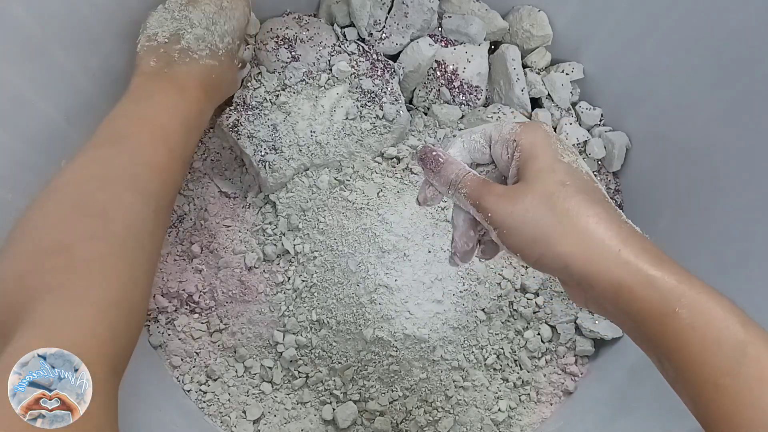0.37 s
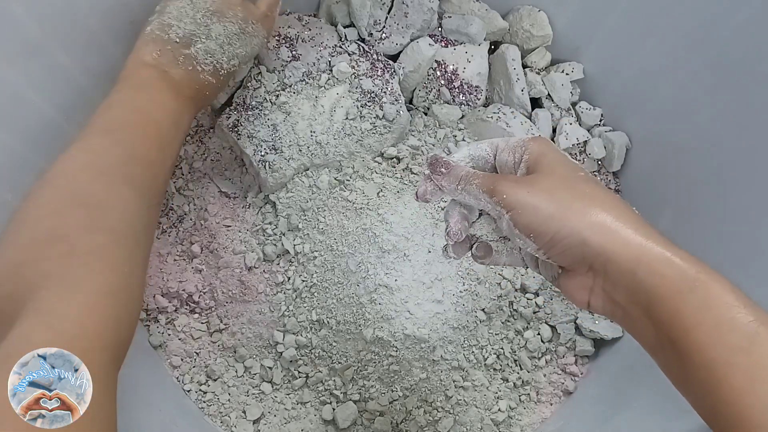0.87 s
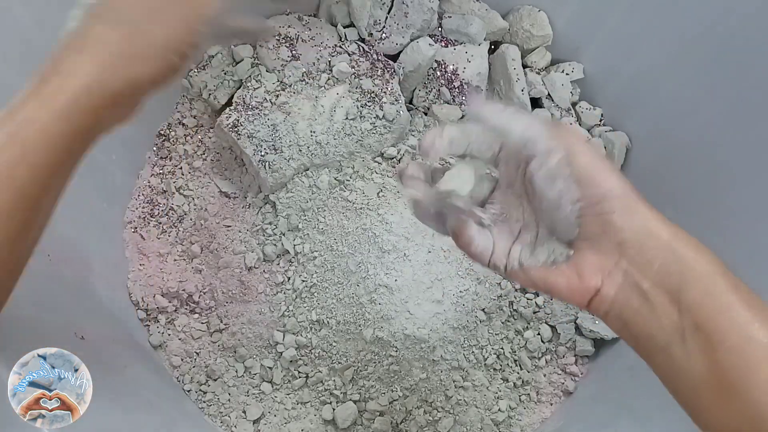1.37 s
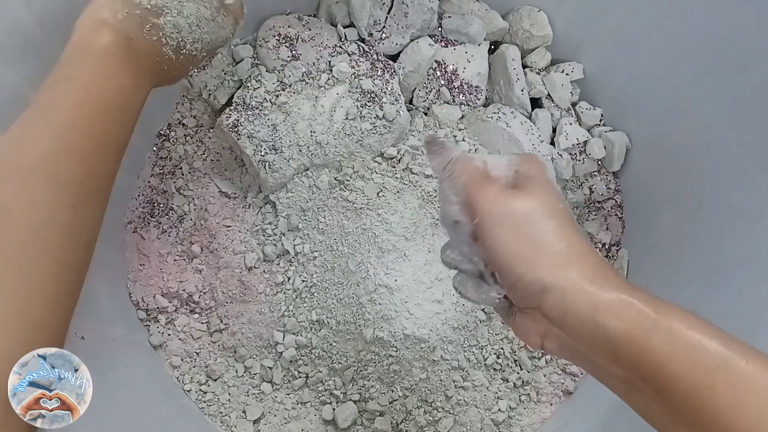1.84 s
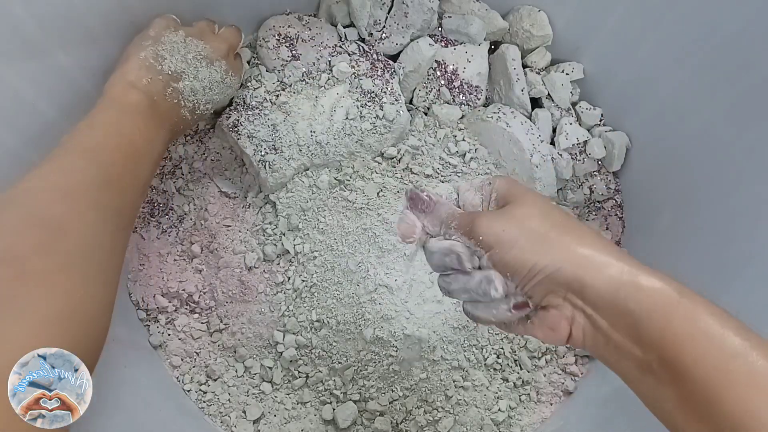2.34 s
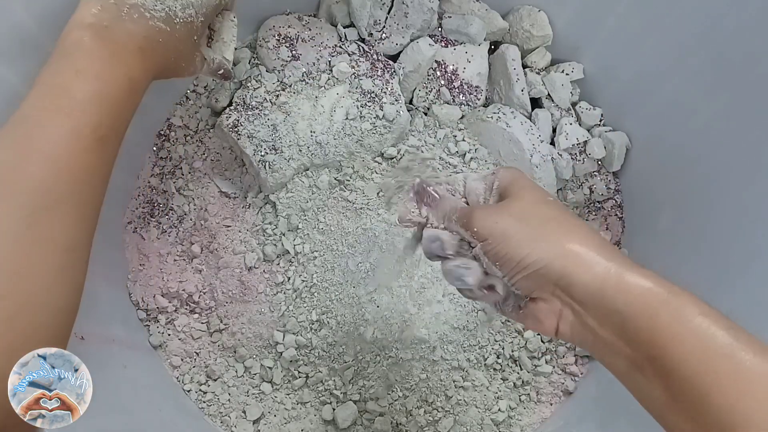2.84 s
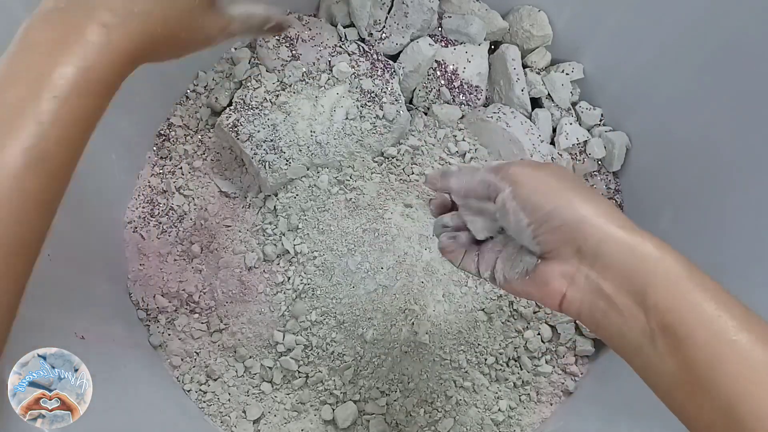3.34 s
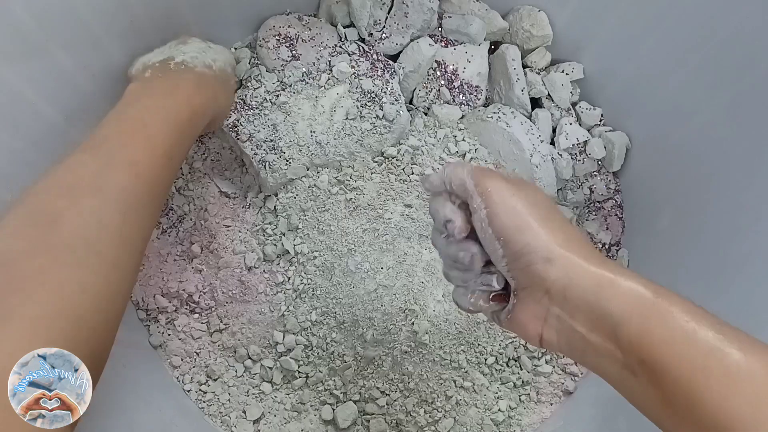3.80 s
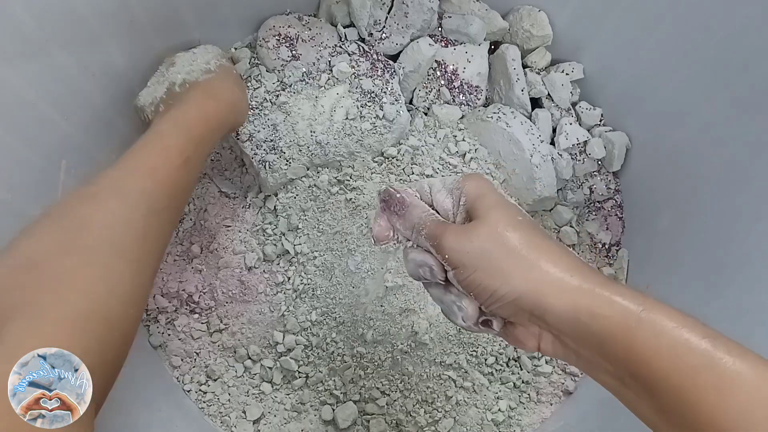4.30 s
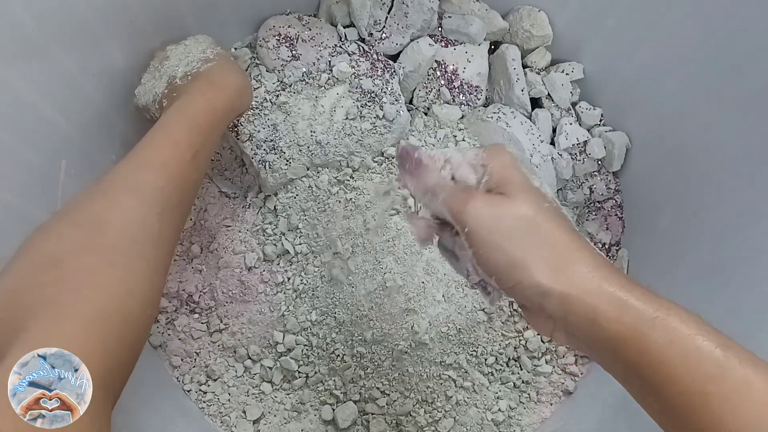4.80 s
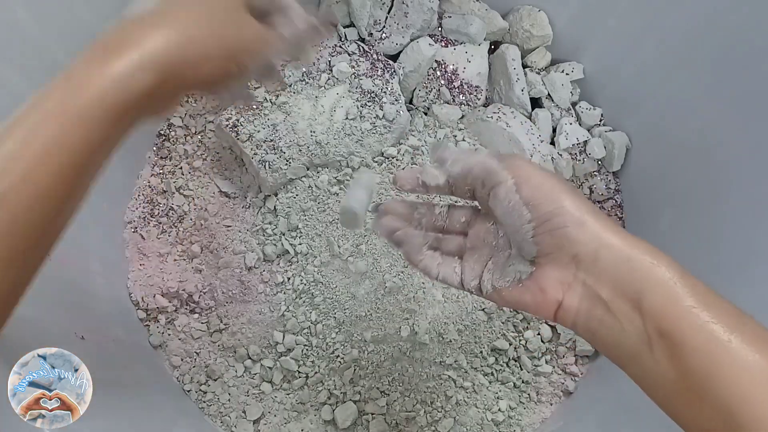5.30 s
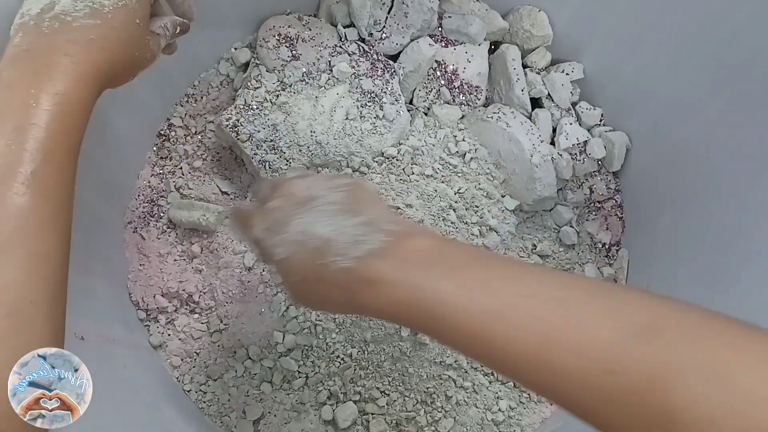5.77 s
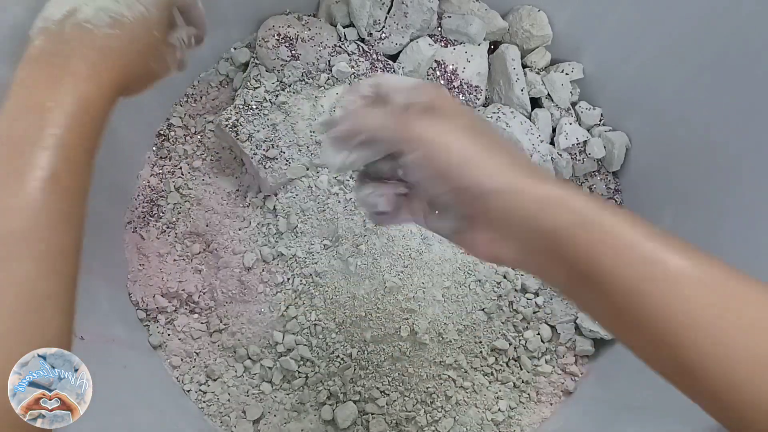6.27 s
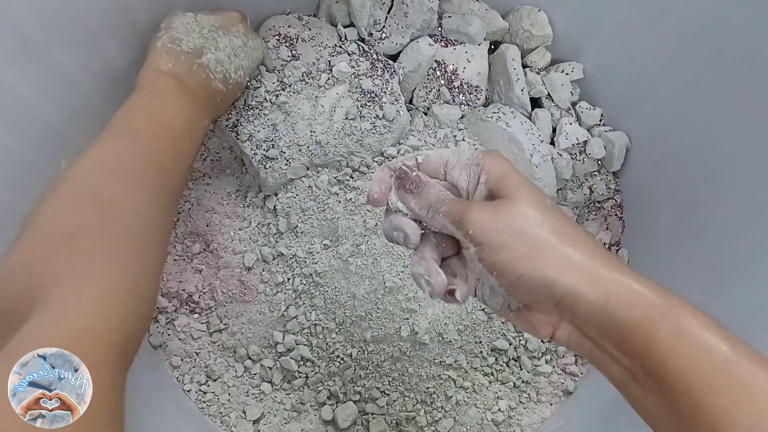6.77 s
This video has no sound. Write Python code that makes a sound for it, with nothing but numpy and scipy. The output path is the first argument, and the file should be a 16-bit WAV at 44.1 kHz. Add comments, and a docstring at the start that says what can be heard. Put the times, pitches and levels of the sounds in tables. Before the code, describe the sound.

Bright, dry grit rushes from pressing fingers while brittle lumps crack, some with a hollow cupped-hand colour. Early crumbling leads to thumps, then a run of crunches and snaps; a sharp crack at four and a half seconds precedes heavier drops and a last crisp break. Close, nearly mono sound with a very short basin tail, quiet airy room noise and thin rapid ticking.

```python
"""Crushing dry chalk over a basin

Hands crush dry chalk over a wide plastic basin in a quiet room, close to a small microphone.
Powder hisses and grinds as clumped noise grains; lumps snap in bursts of tiny cracks or knock as short rings.
Dropped chunks thud and ring the basin's modes. A low room rumble, steady air noise and a faint whine
lie underneath, with a thin electric tick that stutters about sixty times a second."""
import sys
import numpy as np
from scipy import signal
from scipy.fft import rfft, irfft, next_fast_len
from scipy.io import wavfile
from scipy.ndimage import uniform_filter1d

SR = 44100
rng = np.random.default_rng(int(sys.argv[2]) if len(sys.argv) > 2 else 0)


def bounce(signal):
    """Save signal as a 16-bit WAV file at the path given by the first command-line argument."""
    frames = np.transpose(np.atleast_2d(signal))
    limited = np.clip(frames, -1, 1)
    pcm = np.round(limited * 32767).astype(np.int16)
    wavfile.write(sys.argv[1], SR, pcm)


def how_loud(loudness_db):
    """Turn decibels into a plain amplitude multiplier (0 dB gives 1, 20 dB gives 10)."""
    steps = np.asarray(loudness_db, float) / 20
    return 10 ** steps


N = 303849  # length in samples


def evened(x):
    """Scales to rms 1."""
    return x / np.sqrt(np.mean(x ** 2) + 1e-20)


def colour(x, points):
    """Filters by a spectrum given as points on a log-frequency axis."""
    hz, db = np.transpose(points)
    size = next_fast_len(x.shape[-1])
    bins_hz = np.fft.rfftfreq(size, 1 / SR)
    gain = how_loud(np.interp(np.log(bins_hz + 1), np.log(hz), db))
    return irfft(rfft(x, size) * gain, size)[..., :x.shape[-1]]


def follow(table):
    """Joins the rows of a curve by straight lines, one array a column."""
    s, *columns = np.transpose(table)
    return [np.interp(np.arange(N) / SR, s, c) for c in columns]


def add(mix, s, sound):
    """Mixes a sound in at a time in seconds."""
    start = max(round(s * SR), 0)
    part = mix[start:start + len(sound)]
    part += sound[:len(part)]


def wander(width):
    """Slow random drift of rms 1: noise averaged twice over a width in samples."""
    return evened(uniform_filter1d(uniform_filter1d(rng.standard_normal(N), width), width))


def grit(per_s, spread_db, clump_ms, clump_db):
    """Dense cracks of uneven size that come in clumps."""
    sizes = how_loud(spread_db * np.minimum(rng.exponential(1, N), 5)) * rng.standard_normal(N)
    clumps = wander(max(round(clump_ms * SR / 1000), 1))
    return sizes * (rng.random(N) < per_s / SR) * how_loud(clump_db * clumps)


def resonate(x, hz, width_hz):
    """Shifts the curve hz down to zero, smooths, and shifts back: a moving resonance."""
    turn = np.exp(2j * np.pi * np.cumsum(hz) / SR)
    r = np.exp(-np.pi * width_hz / SR)
    return 2 * (turn * signal.lfilter([1 - r], [1, -r], x / turn)).real


def swells(s, db, rise_ms, fall_ms):
    """Power over time of swells that climb to a peak and fall away, evenly in dB; one row a swell."""
    step = 32  # samples between points
    s, db, rise_ms, fall_ms = (np.reshape(v, (-1, 1)) for v in (s, db, rise_ms, fall_ms))
    ms = (np.arange(N // step + 1) * step / SR - s) * 1000
    slope = np.where(ms < 0, ms / np.maximum(rise_ms, 5), -ms / np.maximum(fall_ms, 5))
    return np.repeat(how_loud(db + 20 * slope) ** 2, step, axis=1)[:, :N]


# Low rumble of hands on the basin. Each row: time in seconds, rms level in dB.
HANDLING = [(0.0, -41.5), (0.15, -52.5), (0.48, -40), (0.88, -52), (1.23, -47), (1.38, -56), (1.57, -47),
            (1.73, -50), (2.59, -58), (3.03, -41.5), (3.2, -42), (3.5, -58.5), (4.11, -51), (4.53, -60),
            (4.8, -48), (5.35, -57.5), (5.91, -50.5), (6.2, -59.5), (6.89, -55.5)]
# Spectrum of that rumble. Each row: frequency in Hz, level in dB.
RUMBLE = [(30, -52), (80, -18), (145, -2), (280, 1.5), (430, -18.5), (700, -46)]
# Spectrum of the air and microphone noise. Each row: frequency in Hz, level in dB.
FLOOR = [(30, -8), (84, 4.5), (145, 6.5), (280, 1), (437, -8), (1010, -11), (2290, -19), (4400, -18),
         (5000, -14), (9220, -6), (11400, -25), (12200, -19.5), (16000, -7)]
FLOOR_DB = -44  # rms
WHINE_HZ, WHINE_DB = 14127, -64  # a thin steady electric whine


def room():
    """Steady air and microphone noise and a whine, with a lumpy low rumble from the hands on the basin."""
    air = how_loud(FLOOR_DB) * evened(colour(rng.standard_normal(N), FLOOR))
    whine = how_loud(WHINE_DB) * np.sin(2 * np.pi * WHINE_HZ * np.arange(N) / SR)
    rumble = evened(colour(grit(1500, 2.0, 30, 2.5), RUMBLE))
    return air + whine + how_loud(follow(HANDLING)[0]) * rumble


TICK_S, TICK_DB, TICK_HZ = .016567, -27, 9800  # even gap, least level, pitch


def ticks():
    """One-cycle ticks in short even runs; every third gap or so slips to a chance length."""
    slips, lengths, levels = rng.random((int(N / SR / TICK_S * 2), 3)).T
    gaps = TICK_S * np.where(slips < .33, .4 + 1.5 * lengths, 1)
    at = (np.cumsum(gaps) * SR).astype(int)
    heard = at < N
    train = np.zeros(N)
    train[at[heard]] = how_loud(TICK_DB + 2.2 * levels[heard])
    t = np.arange(-12, 13) / SR
    cycle = -np.sin(2 * np.pi * TICK_HZ * t) * np.exp(-(t * TICK_HZ / 0.62) ** 2)
    return np.convolve(train, cycle, "same")


# Chunks land in the basin or hands bump it. Each row: start in seconds, level in dB,
# hardness as dB on the modes above 200 Hz, weight as dB on the lowest mode.
THUDS = [(0.269, -34, 2, -11), (0.462, -36.5, 9.5, -11), (0.548, -27, -4, -18), (0.612, -30.5, 0.5, -1),
         (0.648, -26, -4, -5), (0.839, -31, 13.5, -14), (1.135, -19.5, 5, 5), (1.294, -16, 6.5, 4),
         (2.269, -38.5, -14, 3), (3.073, -19.5, 3.5, -5), (3.109, -38, 2, -4), (3.153, -35, 3.5, -2),
         (3.495, -41, -21, 13), (3.6, -32, 3.5, 7.5), (4.211, -35.5, -1, 6), (4.707, -39, 6.5, 7),
         (5.051, -17, 3, 4), (5.621, -31.5, 17, -8), (5.635, -16.5, 4.5, 8), (6.428, -14.5, 3.5, 4),
         (6.453, -25, 10, 0)]
# Modes of the plastic basin. Each row: frequency in Hz before detuning, level in dB, t60 in seconds.
BASIN = [(82.6, 2, 0.096), (146.3, 6.5, 0.11), (242.4, -4.5, 0.057), (316, -10, 0.089), (600, -11, 0.051),
         (961, -11.5, 0.026), (1550, -20, 0.047), (2650, -32.5, 0.038)]


def thuds():
    """The basin's modes ring after each blow, the bass swelling a few ms after the hard top."""
    out, t = np.zeros(N), np.arange(SR // 3) / SR
    place = rng.standard_normal((len(THUDS), len(BASIN)))  # each blow detunes the modes a little
    for (s, db, hard_db, weight_db), detune in zip(THUDS, place):
        sound = np.zeros(len(t))
        for (hz, level_db, t60), d in zip(BASIN, detune):
            mode_db = level_db + hard_db * (hz > 200) + weight_db * (hz < 110)
            envelope = how_loud(mode_db - 60 * t / t60) * (1 - np.exp(-t * hz / 0.41)) ** 2
            sign = np.sign(hz - 110)  # the lowest mode swings the other way first
            sound += envelope * sign * np.sin(2 * np.pi * hz * (1 + 0.048 * d) * t)
        add(out, s, how_loud(db) * sound)
    return out


# each thud throws up crumbs and dust: dB relative to the thud, ms to rise and fall 20 dB
CRUMBS_DB, DUST_DB, THROW_RISE_MS, THROW_FALL_MS = -27.5, -30.5, 19, 88


def thrown(under_db):
    """Power over time of what the thuds throw up."""
    s, db, *_ = np.transpose(THUDS)
    return swells(s, db + under_db, THROW_RISE_MS, THROW_FALL_MS).sum(0)


# Lumps knock in the fist or on the heap. Each row: start in seconds, peak in dB, pitch in Hz,
# t60 of the rattle in ms (5 at least).
KNOCKS = [(0.196, -35.5, 1020, 88), (0.435, -39, 1020, 180), (0.829, -17, 870, 41), (0.842, -30, 465, 220),
          (1.006, -35, 630, 69), (1.053, -30.5, 1060, 50), (1.13, -22.5, 1600, 12), (1.131, -22, 565, 31),
          (1.293, -23.5, 510, 70), (1.811, -23, 2560, 72), (2.063, -28, 1050, 44), (2.093, -34, 1190, 100),
          (2.174, -32, 1080, 59), (2.25, -43, 1230, 28), (2.529, -25, 1300, 13), (3.058, -27.5, 600, 53),
          (3.07, -33, 2700, 16), (3.07, -31.5, 1720, 13), (3.07, -22, 530, 10), (3.261, -29.5, 310, 35),
          (5.034, -31, 605, 79), (5.048, -25, 623, 81), (5.319, -43.5, 760, 15), (5.621, -31.5, 2440, 31),
          (5.621, -24.5, 1035, 54), (5.635, -14.5, 947, 16), (6.085, -35.5, 975, 120),
          (6.425, -24, 666, 31), (6.76, -46, 1410, 74), (6.776, -31, 1550, 140)]
# Spectrum of first contact and of dull cracking. Each row: frequency in Hz, level in dB.
CRACK = [(150, -29), (400, -9), (1100, -7.5), (2500, -9), (4000, -1), (7000, -7), (12000, -16)]


def knocks():
    """A hollow lump rings briefly and unevenly, driven by a dying rattle of blows; the first contact cracks."""
    out, t = np.zeros(N), np.arange(SR // 6) / SR
    rattle = rng.standard_normal((len(KNOCKS), len(t)))
    for (s, db, hz, t60_ms), blows in zip(KNOCKS, rattle):
        ring = np.sin(2 * np.pi * hz * t) * how_loud(-60 * t / max(.012, 14 / hz)) * (1 - np.exp(-t * hz / .6))
        blows = blows * how_loud(-60000 * t / max(t60_ms, 5)) * (1 - np.exp(-t / 0.00012))
        body = evened(signal.fftconvolve(blows, ring)[:len(t)])
        contact = evened(colour(blows * how_loud(-60 * t / 0.26), CRACK))
        sound = body + 0.27 * min(hz / 1200, 1) * contact  # low lumps crack less
        add(out, s, how_loud(db) * sound / abs(sound).max())
    return out


# Lumps snap. Each row: peak in seconds, coarse grit in dB, finest grit in dB,
# build-up over the last 20 dB in ms (0.3 at least), dying t60 in ms (2 at least).
SNAPS = [(0.605, -52, -40, 1.5, 7.4), (0.836, -52, -34.5, 1.8, 4.1), (1.0445, -41, -31.5, 0.77, 11),
         (1.295, -38, -21, 3.3, 7.7), (1.3586, -47, -42, 18, 23), (1.6695, -38.5, -40, 8.9, 36),
         (1.814, -21, -22, 11.5, 17), (1.874, -39.5, -41, 6.2, 23), (1.8882, -38, -32, .6, 2.7),
         (2.111, -39, -40, 2, 18), (2.1664, -45, -33.5, 12, 36), (2.231, -39, -39, 6.1, 80),
         (2.2686, -45, -36, 1.4, 67), (2.302, -42, -36, 2, 12), (2.3204, -36.5, -36, 1.1, 8),
         (2.396, -48, -38, 2, 8), (2.463, -38, -38, 3, 11), (2.511, -42.5, -22, 9.1, 46),
         (2.808, -38, -38.5, 26, 38), (2.9475, -53, -39, 2, 10), (3.168, -53, -35.5, 12, 5.4),
         (3.48, -28, -23.5, 5.4, 20), (3.505, -36.5, -43, 1.4, 23), (3.5786, -36, -25, 2.1, 6.1),
         (3.599, -31.5, -31, 11, 35), (3.646, -40, -40, 2.0, 30), (3.6706, -45, -28.5, 13, 30),
         (3.994, -57, -36, 1, 7.8), (4.053, -51, -36, 3, 11), (4.1797, -35.5, -40, 1.1667, 7.8),
         (4.227, -35, -36, 8.5, 15), (4.316, -41.5, -53, 1.2667, 25), (4.507, -55, -20, 5.9, 12),
         (4.517, -65, -11, 10.7, 13), (4.7514, -39, -40, 6.5, 32), (5.2682, -31, -23, 0.72, 9.7),
         (5.301, -43, -39, 1.5, 22), (5.432, -36.5, -29, 3.3, 18), (5.633, -46, -43, 33, 37),
         (6.31, -50, -40.5, 9, 50), (6.716, -50, -48, 1, 5), (6.7285, -22, -13.5, 2.2, 11),
         (6.762, -37, -40, 1, 12), (6.805, -47, -48, 1, 5), (6.825, -30.5, -55, 0.88, 7.2),
         (6.848, -45, -55, 1, 5), (6.8531, -36, -55, 1.7, 8.8)]
# Spectrum of coarse grit. Each row: frequency in Hz, level in dB.
COARSE = [(1500, -70), (3000, -30), (3900, -18), (4600, -4), (6000, 0), (7500, -5), (9000, -18),
          (16000, -30)]
# Spectrum of the finest grit. Each row: frequency in Hz, level in dB.
FINE = [(3000, -70), (6800, -26), (8500, -8), (10300, 0), (12000, -1), (13500, -5), (16000, -13)]
# Snaps carry less of the highest air than the powder. Each row: frequency in Hz, gain in dB.
SNAP_TOP = [(11000, 0.5), (13000, -9), (16000, -4)]
SNAP_BODY_DB = -15.5  # dull crack of the lump itself, relative to its coarse grit
FIRST_CRACK, SHARP_MS = 8, 2.5  # crack size in swarm rms, for build-ups shorter than this


def snaps():
    """Each snap is a swarm of cracks that builds up and dies, ringing coarse and fine grit."""
    coarse, fine = np.zeros((2, N))
    swarm = evened(grit(16000, 1.5, 1.2, 2.0))
    t = np.arange(-SR // 20, SR // 8) * 1000 / SR  # ms from the peak
    for s, coarse_db, fine_db, rise_ms, t60_ms in SNAPS:
        rise_db = -20 * abs(t / max(rise_ms, .3)) ** 2
        fall_db = -60 * abs(t / max(t60_ms, 2)) ** 2.02
        shape_db = np.where(t < 0, rise_db, fall_db)  # rounded top
        if rise_ms < SHARP_MS:  # a sudden break opens with one hard crack
            swarm[round(s * SR)] = FIRST_CRACK
        add(coarse, s - 1 / 20, how_loud(coarse_db + shape_db))
        add(fine, s - 1 / 20, how_loud(fine_db + shape_db))
    click = signal.unit_impulse(4096) * 64  # rms 1, to level the three spectra
    both = np.zeros(N)
    for envelope, points in ((coarse, COARSE), (fine, FINE), (how_loud(SNAP_BODY_DB) * coarse, CRACK)):
        both += colour(swarm * envelope, points) / np.sqrt(np.mean(colour(click, points) ** 2))
    return colour(both, SNAP_TOP)


# Powder trickles from the working fist. Each row: time in seconds, coarse grit in dB, finest grit in dB.
TRICKLE = [(0.0, -61, -64), (0.97, -62, -56), (1.58, -69, -57.5), (1.66, -57, -51), (2.02, -58, -46.5),
           (2.21, -49, -56.5), (2.49, -41.5, -34), (2.61, -54, -55.5), (2.86, -52, -54), (3.3, -63, -57.5),
           (3.5, -46, -50.5), (3.7, -58, -41.5), (3.9, -61, -54.5), (4.97, -49.5, -52), (5.25, -58, -59),
           (5.85, -67, -59.5), (6.37, -59, -52.5), (6.45, -45, -43), (6.68, -50.5, -51), (6.89, -42, -44)]
# Fingers press and powder rushes out. Each row: peak in seconds, coarse grit in dB, finest grit in dB,
# ms to rise 20 dB, ms to fall 20 dB (5 at least).
PRESSES = [(0.0, -40, -29.5, 50, 20), (0.13, -47, -50.5, 45, 43), (0.277, -47, -52, 152, 130),
           (0.429, -42.5, -43, 106, 150), (0.549, -52.5, -59, 100, 300), (0.851, -49, -64, 240, 284),
           (1.02, -45.5, -42.5, 66, 300), (1.137, -55, -44, 200, 100), (1.364, -48, -58, 100, 100),
           (1.624, -43, -43, 24, 200), (1.811, -35, -32, 225, 62), (1.881, -42.5, -39, 100, 400),
           (2.118, -44.5, -48, 300, 60), (2.17, -47, -46, 50, 96), (2.272, -42, -42, 80, 298),
           (2.522, -43, -44, 76, 21), (2.958, -41, -36, 159, 342), (3.594, -38, -48, 81, 77),
           (3.769, -39.5, -36.5, 152, 144), (3.954, -51, -50, 100, 98), (4.111, -44.5, -42, 241, 133),
           (4.234, -38, -43, 29, 62), (4.393, -42, -36.5, 250, 188), (4.512, -41, -58, 48, 88),
           (4.752, -43.5, -42, 250, 250), (4.871, -43, -37, 165, 163), (5.308, -64, -43.5, 150, 100),
           (5.433, -52, -45, 15, 64), (5.552, -50, -42, 26, 80), (6.101, -51.5, -46.5, 398, 350),
           (6.667, -43, -41.5, 202, 31), (6.735, -41, -49, 31, 200)]


def powder():
    """Gains of coarse and finest grit: the powers of trickle, presses and dust add up."""
    s, *grit_db, rise_ms, fall_ms = np.transpose(PRESSES)
    dust = thrown(DUST_DB)
    return [np.sqrt(how_loud(slow) ** 2 + swells(s, db, rise_ms, fall_ms).sum(0) + dust)
            for slow, db in zip(follow(TRICKLE), grit_db)]


# Lumps crumble. Each row: peak in seconds, level in dB, share from 0 to 1 that rings in the cupped hand,
# ms to rise 20 dB, ms to fall 20 dB (5 at least).
CRUNCHES = [(0.0, -51, 0.02, 50, 190), (0.112, -51.5, 0, 34, 140), (0.205, -46.5, 0.02, 25, 168),
            (0.446, -48.5, 0, 104, 305), (0.561, -50.5, 0.02, 150, 241), (0.836, -26.5, 0.3, -1, 89),
            (0.886, -38.5, 0, 83, 56), (0.93, -58, .3, 60, 47), (1.005, -55, 0.3, 7, 295),
            (1.058, -40, 0, 64, 123), (1.1, -38.5, 0, 172, 59), (1.813, -45, 0, 12, 130),
            (1.906, -47.5, 0.1, 150, 71), (2.07, -44, 0.16, 96, 130), (2.175, -47, 0, 42, 80),
            (2.23, -45.5, 0.6, 98, 60), (2.261, -30.5, 0.17, 51, 85), (2.532, -42.5, 0.1, 79, 78),
            (3.6, -51, 0, 20, 124), (3.73, -53, 0.04, 67, 196), (3.839, -50, 0.5, 85, 86),
            (4.18, -54.5, 0.01, 328, 102), (4.37, -58, 0.02, 130, 400), (4.572, -51, 0.2, 188, 207),
            (4.906, -48, 0.7, 34, 83), (5.321, -41.5, 0, 11, 9), (5.433, -54, 0.01, 72, 93),
            (5.552, -52.5, 0.2, 20, 51), (6.089, -54, 0.1, 64, 170), (6.673, -46, 0.1, 152, 47),
            (6.775, -34, 0, 22, 60), (6.805, -38.5, 0.34, 54, 62), (6.889, -34, 0.9, 19, 49)]
# Spectrum of grinding lumps. Each row: frequency in Hz, level in dB.
LUMPS = [(150, -46), (350, -2.5), (700, 1.5), (1100, 4.5), (1700, 2), (2400, -1.5), (2900, -8.5),
         (6000, -18)]
SHIFTING_DB = -85  # crumbs keep shifting faintly between crunches
HAND_HZ = 1190  # middle pitch of the hollow hand


def squeeze():
    """Powder hisses in two grit sizes while lumps grind lower down, ringing the hollow of the hand."""
    coarse_gain, fine_gain = powder()
    s, db, cupped, rise_ms, fall_ms = np.transpose(CRUNCHES)
    cupped, power = np.clip(cupped, 0, 1), swells(s, db, rise_ms, fall_ms)
    loose = (1 - cupped) @ power + thrown(CRUMBS_DB) + how_loud(SHIFTING_DB) ** 2
    # the first cracks sound in both grit sizes; the second and third each sound in one size alone
    shared, *own = grit(1200, 4.5, 8, 2.5), grit(7000, 3, 22, 2.8), grit(9000, 3, 22, 2.8)
    coarse = evened(colour(0.81 * shared + own[0], COARSE))
    fine = evened(colour(0.77 * shared + own[1], FINE))
    lumps = evened(colour(grit(3500, 2.7, 8, 2.5), LUMPS))
    hand_hz = HAND_HZ * (1 + .05 * wander(3000))  # the hollow changes size
    hollow = evened(resonate(resonate(lumps, hand_hz, 600), hand_hz, 600))
    grind = np.sqrt(loose) * lumps + np.sqrt(cupped @ power) * hollow
    return coarse_gain * coarse + fine_gain * fine + grind


# The powdered basin wall swallows treble. Each row: frequency in Hz, gain in dB.
WALL = [(2000, 4.5), (5000, -5), (12000, -9)]
# Left-right difference against the sum. Each row: frequency in Hz, gain in dB.
WIDTH = [(60, -28), (200, -34), (950, -21.5), (4000, -21), (9000, -27), (15000, -20)]
# Spectrum of noise opposite in left and right. Each row: frequency in Hz, level in dB.
SELF = [(1500, -50), (4500, -23.5), (7000, -11), (12000, -16), (16000, -8.5)]
SELF_DB = -52  # rms before the width cuts in and out


def scene():
    """Sums the sources; the basin wall adds a short tail, and left and right differ a little."""
    near = squeeze() + snaps() + knocks() + thuds()
    t = np.arange(SR // 8) / SR
    wall = rng.standard_normal(len(t)) * how_loud(-60 * t / 0.12)
    echo = signal.fftconvolve(near, wall / np.linalg.norm(wall))[:N]
    mid = near + how_loud(-13) * colour(echo, WALL)
    mid = mid + room() + ticks()
    scatter = evened(uniform_filter1d(rng.standard_normal(N), 600))  # the difference between left and right keeps changing
    quarter_turned = signal.hilbert(mid, next_fast_len(N))[:N].imag
    side = colour(scatter * quarter_turned, WIDTH)
    side += how_loud(SELF_DB) * evened(colour(rng.standard_normal(N), SELF))
    # the width cuts in and out, mostly in the lulls of the fine trickle
    quiet = wander(2500) - .15 * (follow(TRICKLE)[1] + 54) > 0
    side = side * uniform_filter1d(quiet * 1., 400)
    return np.array([mid + side, mid - side])


def low_pass(x):
    """Removes everything above the highest recorded frequency."""
    return signal.sosfilt(signal.butter(12, 16980, fs=SR, output="sos"), x)


# Response of the small close microphone. Each row: frequency in Hz, gain in dB.
MIC = [(20, -11), (45, -6.5), (75, -3), (15700, -1.5), (16000, -36), (17000, -48)]


def record(dry):
    """A small microphone with little deep bass and a band limit."""
    return low_pass(colour(dry, MIC))


dry = scene()
out = record(dry)
bounce(out)
```